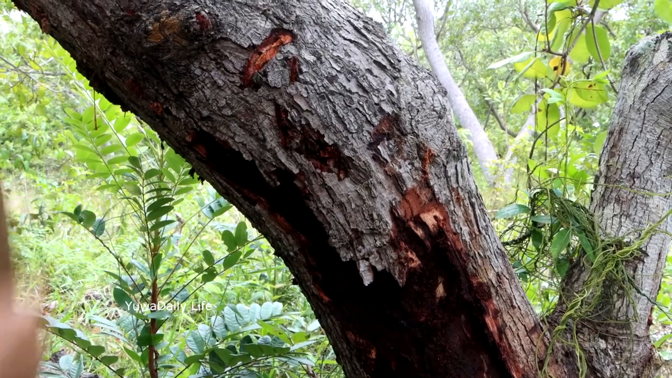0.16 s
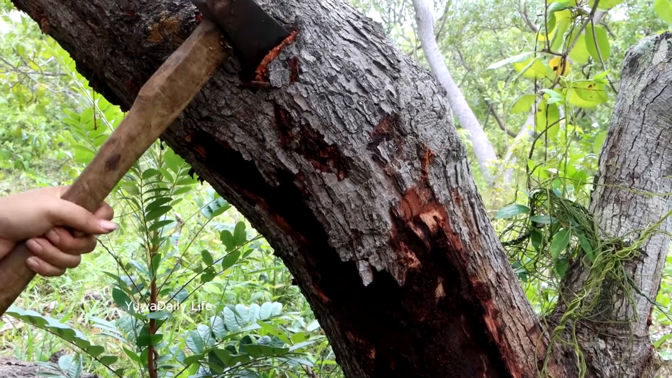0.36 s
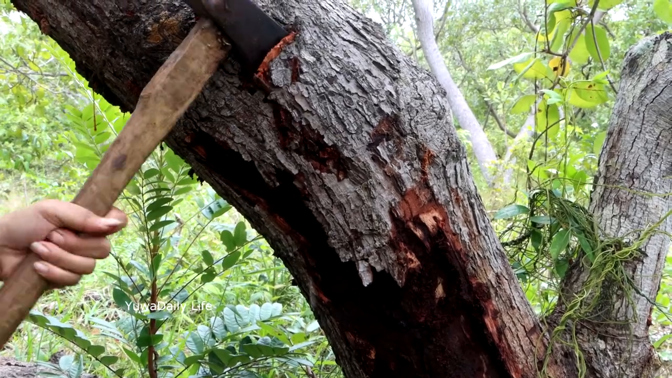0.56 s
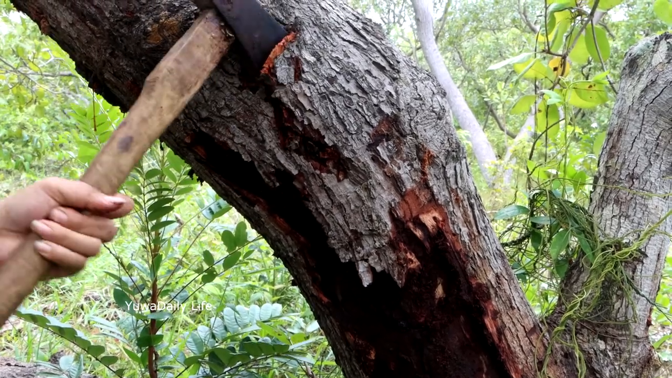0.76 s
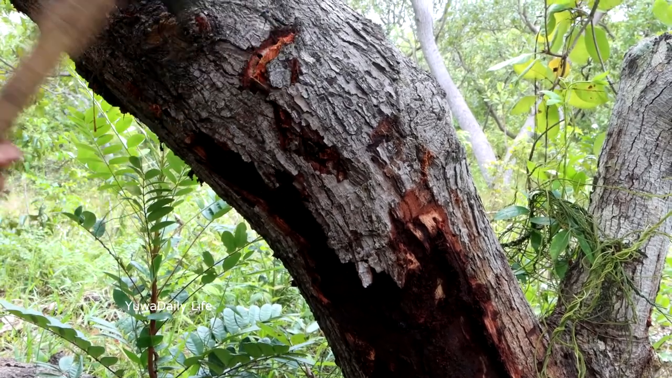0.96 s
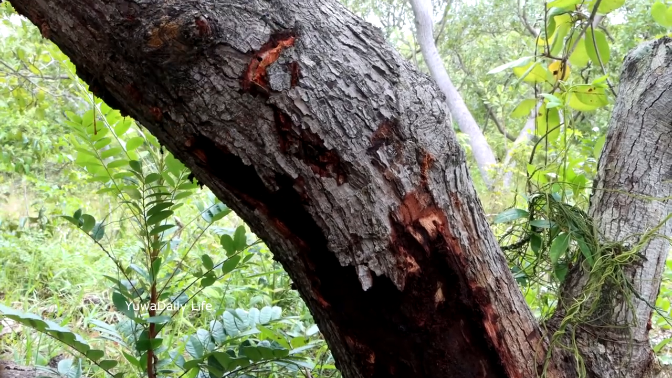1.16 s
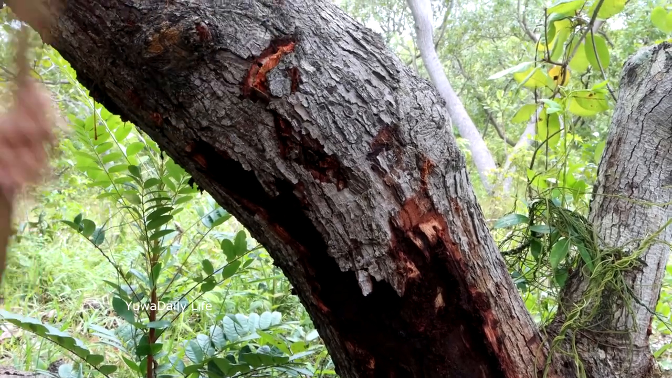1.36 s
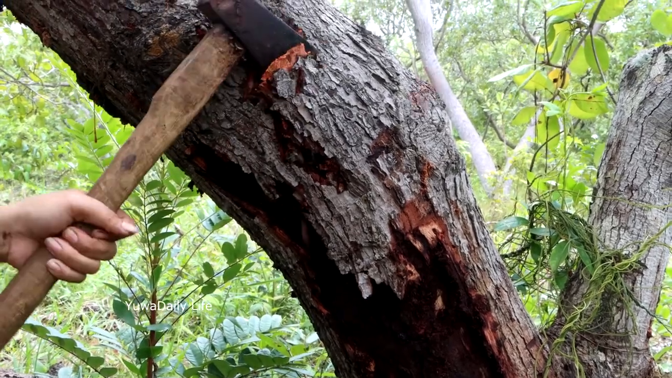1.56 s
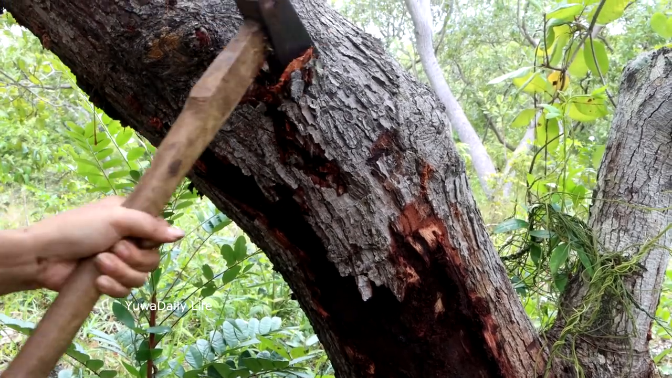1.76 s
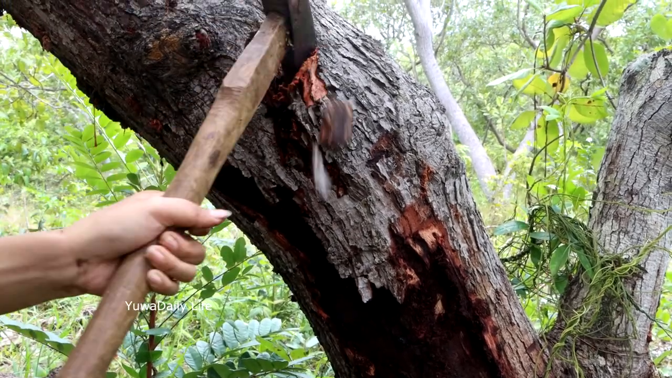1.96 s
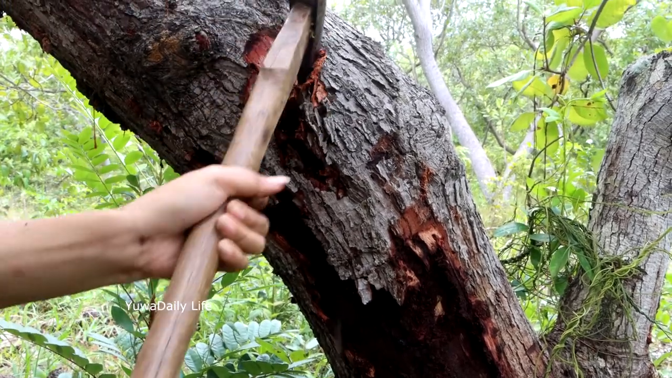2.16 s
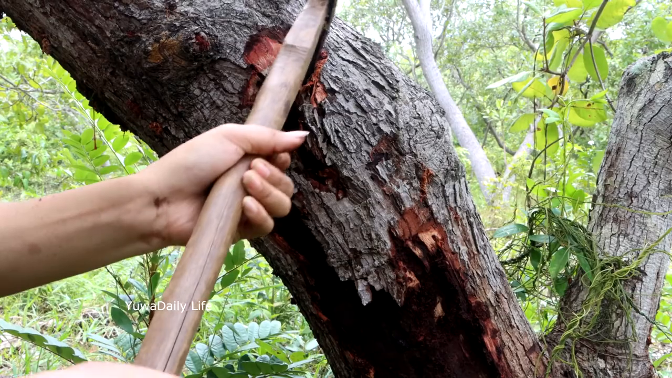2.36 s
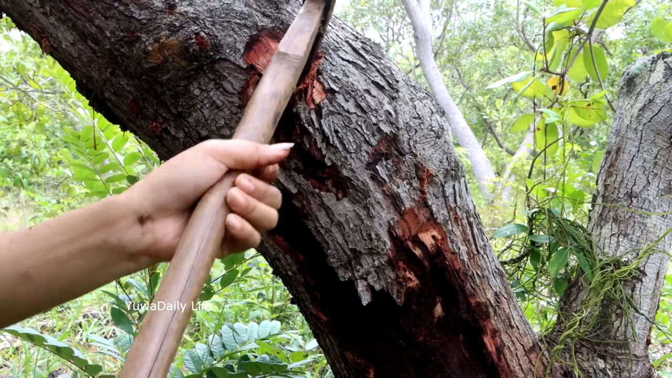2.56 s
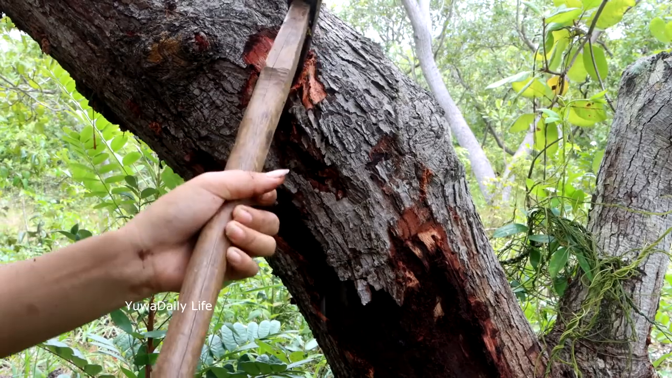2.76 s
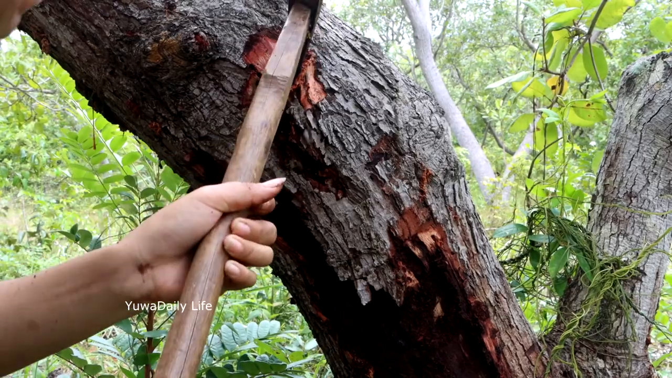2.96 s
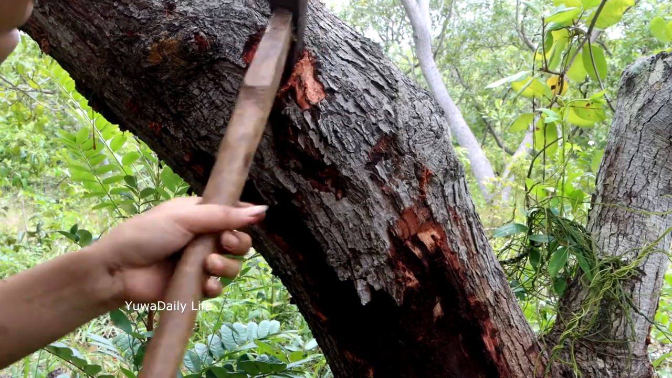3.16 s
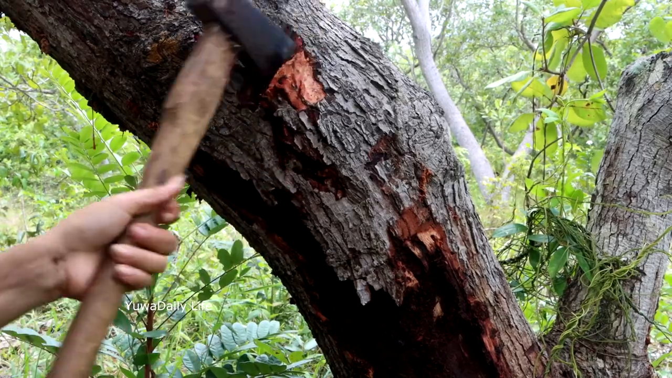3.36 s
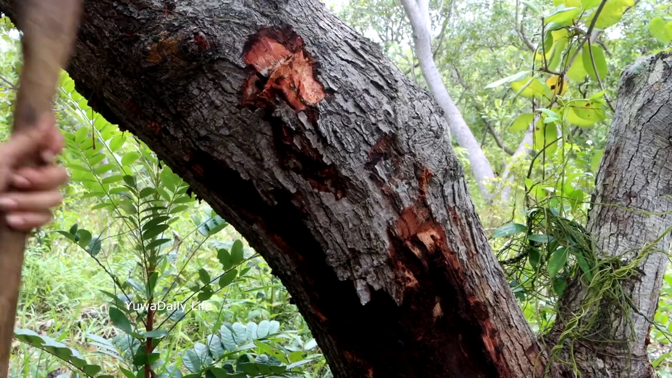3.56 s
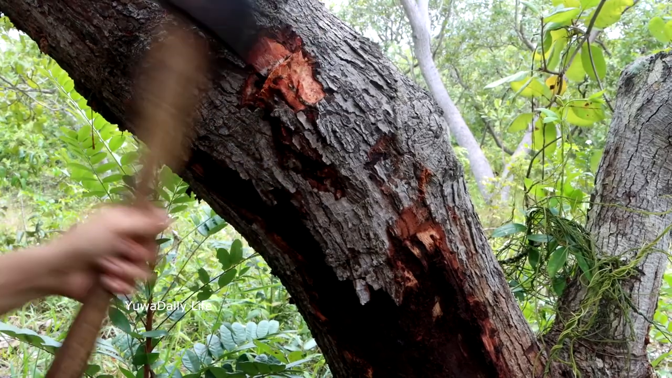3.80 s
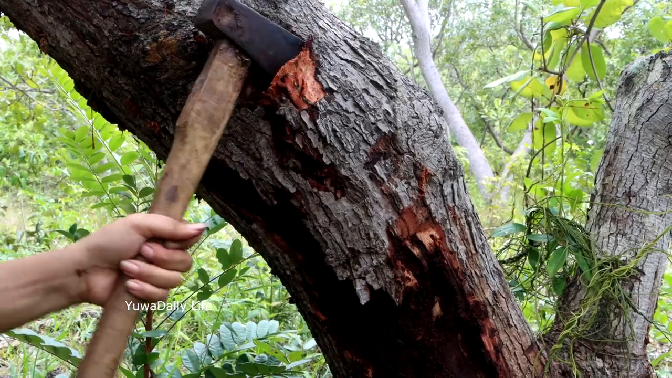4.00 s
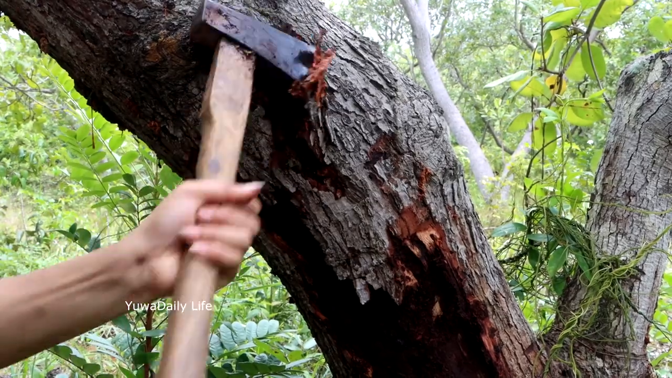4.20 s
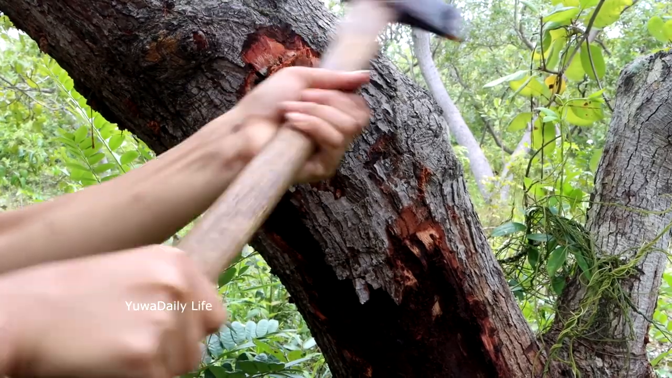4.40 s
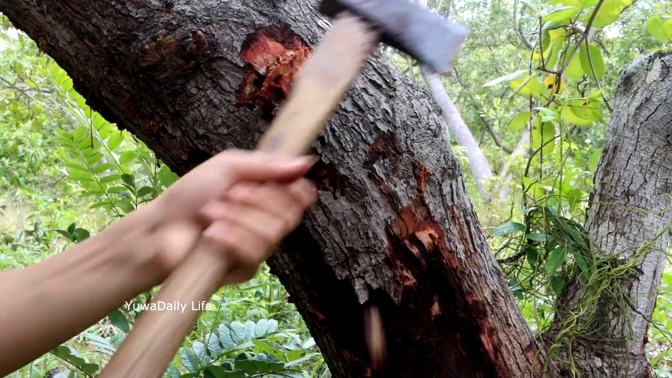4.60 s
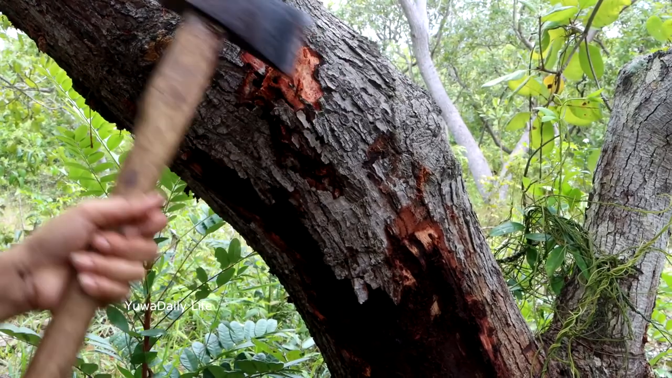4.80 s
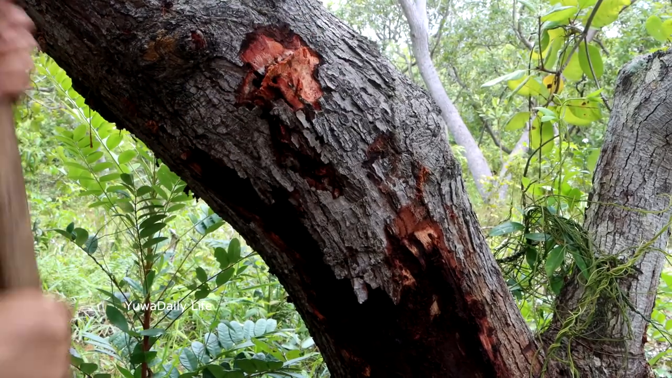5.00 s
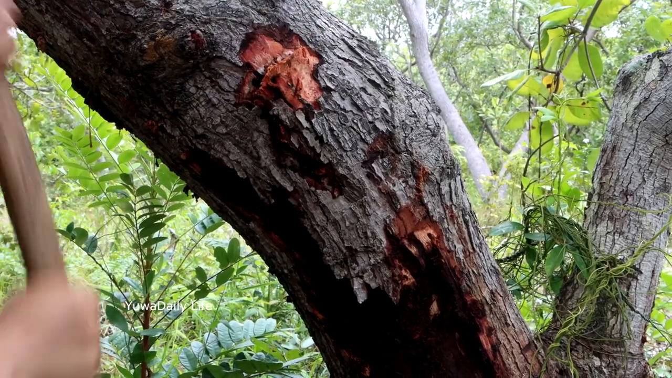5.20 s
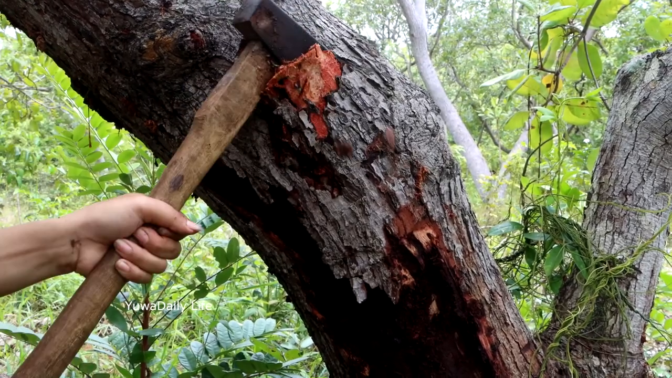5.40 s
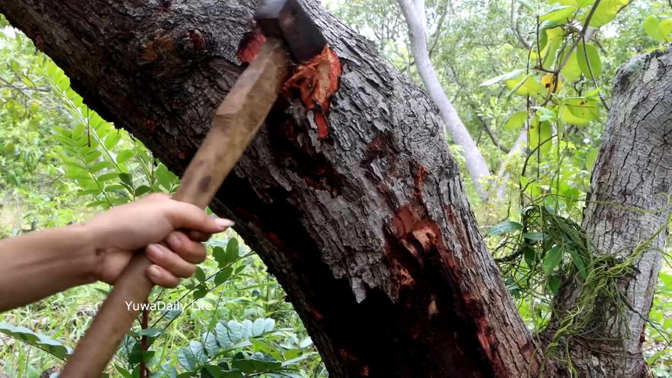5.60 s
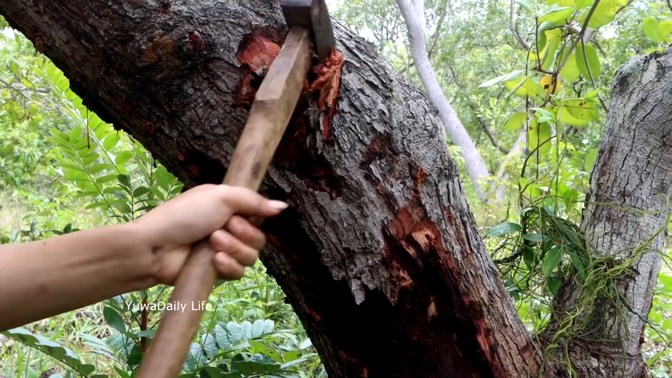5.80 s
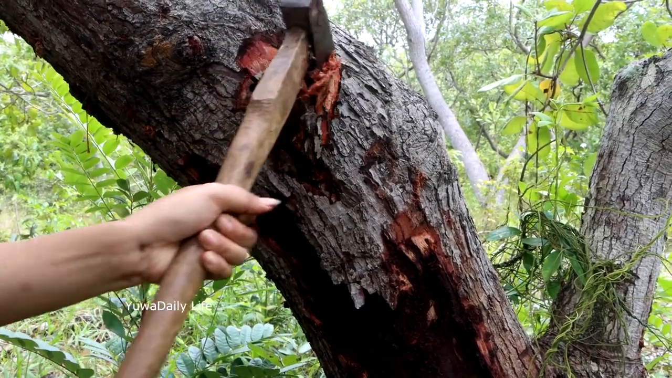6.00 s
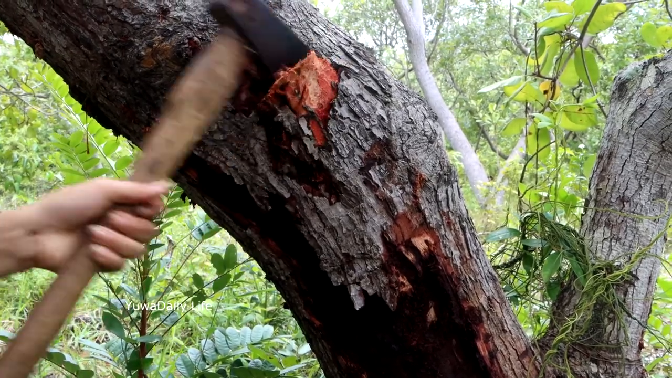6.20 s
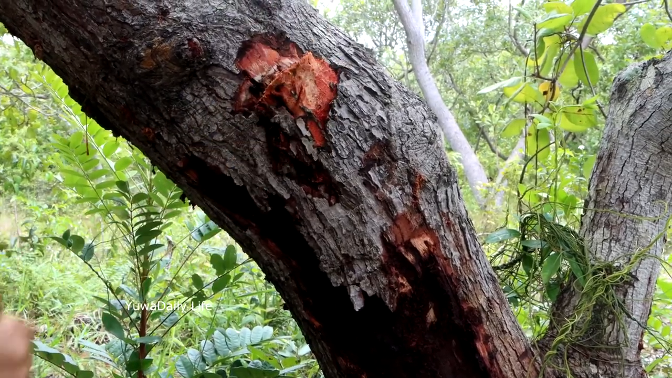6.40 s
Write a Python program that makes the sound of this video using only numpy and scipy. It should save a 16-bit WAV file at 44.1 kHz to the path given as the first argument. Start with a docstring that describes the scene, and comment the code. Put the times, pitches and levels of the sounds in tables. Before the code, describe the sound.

Four dry chops into a thick trunk in a quiet wood, heard close and centred. The first is sharp, the second has a longer, rougher tear, and after a long pause of prying come a third solid hit and a weaker, crisper fourth. Quiet bark crackle, splinter ticks, small hollow slips, light brushing and dull bumps fill the gaps, over a barely audible, slightly wide air noise.

```python
"""A small hatchet chops four times into a leaning tree trunk, close to the microphone in a quiet wood.
Each blow is a few dead knocks, short rings of trunk and steel, and a burst of tearing fibres made of grains.
Between blows the blade is levered in the cut: it slips with knocks and scrapes, bark snaps and crumbles.
Light brushing strokes and dull bumps fall in between. Undergrowth and further trees scatter a noise tail;
behind it lies the faint steady air of the wood, coloured noise that is wider in the treble."""
import sys
import numpy as np
from scipy import signal
from scipy.fft import rfft, irfft
from scipy.io import wavfile

SR = 44100
rng = np.random.default_rng(int(sys.argv[2]) if len(sys.argv) > 2 else 0)


def persist_wave(psi):
    """Save psi, clipped to +-1, as 16-bit WAV."""
    counts = np.round(np.clip(psi, -1, 1) * 32767).astype(np.int16)
    wavfile.write(sys.argv[1], SR, np.atleast_2d(counts).T)


N = 284445
AGE = np.arange(SR // 3) / SR  # seconds since a contact


def undb(db):
    """Decibels to gain."""
    return 10 ** (np.asarray(db) / 20)


def sized(x, db):
    """Scale a short sound so that its energy, spread over 10 ms, has this level."""
    return x * undb(db) / np.sqrt(np.sum(x ** 2) / (SR / 100))


def add(track, s, x):
    """Mix x into the track from time s on."""
    start = max(int(s * SR), 0)
    track[start:start + len(x)] += x[:max(len(track) - start, 0)]


def fade(age, t60):
    """Exponential decay by 60 dB in t60 seconds."""
    return np.exp(-np.log(1000) * age / t60)


def colour(x, points):
    """Minimum-phase filter with the given (frequency [Hz], level [dB]) outline."""
    hz, db = np.transpose(points)
    bins = np.maximum(np.fft.rfftfreq(4096, 1 / SR), 1)
    outline_db = np.interp(np.log(bins), np.log(hz), db)
    # folding the cepstrum onto positive times makes the filter causal
    cepstrum = irfft(np.log(undb(outline_db)))
    half = len(cepstrum) // 2
    cepstrum[1:half] *= 2
    cepstrum[half + 1:] = 0
    response = irfft(np.exp(rfft(cepstrum)))
    return signal.fftconvolve(x, response)[:len(x)]


def tilted(points, db_per_octave):
    """Lean a table of (frequency [Hz], level [dB], ..) rows about 1 kHz."""
    return [(hz, db + db_per_octave * np.log2(hz / 1000), *rest) for hz, db, *rest in points]


def hump(hz):
    """Outline of the broad resonance of a small piece of wood."""
    return [(hz / 9, -28), (hz / 2.28, -11), (hz, 0), (hz * 1.57, -11), (hz * 3, -25), (hz * 12, -42)]


def ring(hz, t60, rise_ms):
    """A damped resonance that builds up while the contact lasts."""
    swell = 1 - np.exp(-(1000 * AGE / rise_ms) ** 2)
    return np.sin(2 * np.pi * hz * AGE) * swell * fade(AGE, t60)


def modes(table, rise_ms):
    """All the modes of a struck object, in alternating sign, none longer than a limit that falls with pitch."""
    total = np.zeros(len(AGE))
    for k, (hz, db, t60) in enumerate(table):
        longest_t60 = .04 + 6 / hz
        total += (-1) ** k * undb(db) * ring(hz, min(t60, longest_t60), rise_ms)
    return total


def grains(size, rate, spread_db):
    """Random tiny fractures, rate per second, most weak and a few strong."""
    strength = undb(spread_db * np.minimum(rng.exponential(size=size), 4))
    return (rng.random(size) < rate / SR) * strength * rng.standard_normal(size)


def tearing(bite_ms, t60, spread_db):
    """Fibres break densely while the blade moves and die away once it stops."""
    stopped = np.maximum(AGE - bite_ms / 1000, 0)  # seconds since the blade stopped
    slowing = np.exp(-.6 * np.minimum(1000 * AGE / bite_ms, 1))
    onset = 1 - np.exp(-AGE / 0.00074)
    return grains(len(AGE), 14000, spread_db) * onset * slowing * fade(stopped, t60)


# the four blows: (time [s], trunk level [dB], trunk tilt [dB/octave], tearing level [dB],
# tearing tilt [dB/octave], splinter level [dB], bite [ms], head ring level [dB])
BLOWS = [(0.3143, -29.5, 2.5, -28.5, -3, -52, 3.9, -40.5),
         (1.4798, -35.5, 2.5, -26.5, -2, -42.5, 15.9, -30.5),
         (3.8922, -33, 0.5, -34.5, 0.5, -52, 10.6, -35), (5.3897, -39.5, -2, -35.5, 3, -50, 7.6, -40.5)]
# dead knocks as the blade enters the wood in jolts: (time [s], level [dB], frequency [Hz], t60 [s])
ENTRY_JOLTS = [(0.3148, -25, 877, 0.01), (0.318, -27.5, 1508, 0.0054), (0.3196, -34.5, 720, 0.013),
               (1.4801, -27.5, 740, 0.016), (1.484, -33.5, 1345, 0.0086), (1.4876, -48, 2030, .008),
               (1.4947, -36, 1060, .008), (3.8924, -25.5, 1233, 0.012), (3.8972, -39.5, 373, 0.018),
               (5.3933, -47.5, 493, 0.0085), (5.394, -52, 230, 0.04)]
# trunk under the blade, before tilt and length limit: (frequency [Hz], relative level [dB], t60 [s])
TRUNK_MODES = [(185, -4, 0.053), (278, 0, 0.083), (330, -5, 0.032), (415, 3.5, 0.026), (575, 1, 0.016),
               (719, 1.5, .035), (839, 3, 0.095), (1122, -1, 0.018), (1200, -9.5, .028), (1485, -7, 0.027)]
# steel head and handle, damped by the cut, before length limit:
# (frequency [Hz], relative level [dB], t60 [s])
HEAD_MODES = [(1910, 1.5, 0.029), (2335, -11, 0.022), (2478, 3, 0.025), (2963, -3, 0.017),
              (3327, 5.5, 0.027), (3970, -12, .03), (4380, 1, .02), (4340, -1, 0.047), (4910, -15, 0.022),
              (6500, -10, 0.0367)]
# colour of tearing wood, before tilt: (frequency [Hz], relative level [dB])
TEARING_COLOUR = [(60, -21), (150, -21), (400, -9), (750, -2.5), (1500, -5), (2100, -2), (2600, 0),
                  (3400, -3), (4700, 1), (5800, -14.5), (8000, -21.5), (16000, -32.5)]
# colour of its finest splinters: (frequency [Hz], relative level [dB])
SPLINTER_COLOUR = [(2500, -28), (5000, -5.5), (7000, -2.5), (9500, -6.5), (13000, 1), (16000, -3)]
# colour of scraped and crumbling bark, also for slips and crumble: (frequency [Hz], relative level [dB])
BARK_COLOUR = [(200, -18), (500, -7.5), (830, 1.5), (1100, -5.5), (1450, 0), (2000, -4.5), (3000, -0.5),
               (4500, -5.5), (7000, -14), (10000, -21.5), (16000, -25.5)]


def chops():
    """The edge knocks its way in, fibres tear, trunk and steel ring briefly, loosened bark crackles after."""
    out = np.zeros(N)
    for s, db, hz, t60 in ENTRY_JOLTS:
        add(out, s, sized(ring(hz, t60, rise_ms=0.93), db))
    for s, trunk_db, trunk_tilt, tear_db, tear_tilt, splinter_db, bite_ms, head_db in BLOWS:
        trunk = modes(tilted(TRUNK_MODES, trunk_tilt), rise_ms=1.9)
        head = modes(HEAD_MODES, rise_ms=2.2)
        fibres = tearing(bite_ms, t60=0.023, spread_db=1.5)
        splinters = tearing(bite_ms * 0.41, t60=.045, spread_db=1.5)
        bark = tearing(bite_ms, t60=.11, spread_db=4.0)
        add(out, s, sized(trunk, trunk_db))
        add(out, s, sized(head, head_db))
        add(out, s, sized(colour(fibres, tilted(TEARING_COLOUR, tear_tilt)), tear_db))
        add(out, s, sized(colour(splinters, SPLINTER_COLOUR), splinter_db))
        add(out, s, sized(colour(bark, BARK_COLOUR), tear_db - 15.0))
    return out


# the blade slips in the cut:
# (time [s], knock level [dB], knock frequency [Hz], scrape level [dB], scrape length [ms])
BLADE_SLIPS = [(0.078, -57.5, 930, -58.5, 2.3), (0.6304, -44.5, 646, -64.5, 1.2),
               (0.6503, -53.5, 830, -70, 1.1), (0.6664, -48, 865, -69, 3.3), (0.702, -55, 533, -56.5, 3.7),
               (1.7774, -56, 807, -53.5, 4.2), (1.9601, -41.5, 816, -52.5, 12), (1.999, -53, 875, -55, 2.3),
               (2.0419, -46, 861, -48, 6), (2.141, -57, 840, -55.5, 14), (2.193, -63.5, 926, -55, 3.4),
               (4.277, -66.5, 634, -68.5, 2.6), (4.848, -65, 800, -61.5, 1.4),
               (5.763, -58, 1500, -60.5, 0.99), (5.882, -52.5, 810, -54.5, 5.5),
               (5.902, -67, 845, -57, 6.4), (6.073, -75, 840, -52, 4.8), (6.083, -74, 843, -53, 9.4),
               (6.116, -70, 850, -56.5, 6.9), (6.326, -66, 815, -48.5, 17.7)]


def slips():
    """The stuck blade gives way: a dead tick, a hollow knock and a short stick-slip scrape."""
    out = np.zeros(N)
    for s, knock_db, hz, scrape_db, scrape_ms in BLADE_SLIPS:
        knock = ring(hz, t60=0.018, rise_ms=0.24 + 0.26 * scrape_ms)  # longer slips knock more softly
        tick = ring(hz * 1.25, t60=0.0024, rise_ms=0.38)
        scrape = colour(tearing(scrape_ms, t60=0.036, spread_db=0.5), BARK_COLOUR)
        add(out, s, sized(knock, knock_db) + sized(tick, knock_db - 8) + sized(scrape, scrape_db))
    return out


# the larger splinters snap: (time [s], level [dB], centre frequency [Hz])
SPLINTER_SNAPS = [(0.8101, -55, 2830), (0.8633, -62.5, 3100), (1.1871, -65, 3810), (1.716, -63, 3240),
                  (2.1173, -52, 3540), (2.2344, -56.5, 3480), (2.5762, -59, 3200), (2.6896, -55, 4440),
                  (3.2967, -65.5, 3520), (3.4012, -60.5, 3046), (4.1285, -64.5, 3340), (4.8963, -51, 2920),
                  (4.912, -58, 4170), (4.93, -54.5, 3520), (4.9468, -57.5, 3400), (5.1334, -59, 2780),
                  (5.9691, -53, 4180)]


def snaps():
    """Single splinters crack: a brief ping at their own pitch and a few breaking fibres."""
    out = np.zeros(N)
    for s, db, hz in SPLINTER_SNAPS + small_snaps():
        ping = ring(hz, t60=.005, rise_ms=.25)
        fibres = colour(tearing(bite_ms=0.32, t60=0.014, spread_db=7.0), hump(hz))
        add(out, s, sized(ping, db - 5.5) + sized(fibres, db - 1.5))
    return out


SMALL_SNAPS_PER_S, SMALL_SNAP_HZ = 7, 3500
SMALL_SNAP_OCTAVES = .35  # pitch range to either side
SMALL_SNAP_DB, SMALL_SNAP_FOLLOW = -69.5, 0.68  # level at rest; dB gained per dB of crumbling


def small_snaps():
    """Rows (time [s], level [dB], frequency [Hz]) of faint chance snaps, louder under strain."""
    above_rest_db = 20 * np.log10(strain() / undb(RESTING_DB))
    rows = []
    for when, pitch in rng.random((int(SMALL_SNAPS_PER_S * N / SR), 2)):
        db = SMALL_SNAP_DB + SMALL_SNAP_FOLLOW * above_rest_db[int(when * N)]
        hz = SMALL_SNAP_HZ * 2 ** (SMALL_SNAP_OCTAVES * (2 * pitch - 1))
        rows.append((when * N / SR, db, hz))
    return rows


# pitches at which crumbs of bark break: (frequency [Hz], relative level [dB])
CRUMB_SIZES = [(1450, -10), (2300, -11), (3100, -2), (4100, -9.5), (5600, -2), (8500, -12.5)]


def crumble():
    """Crumbs of several sizes crackle independently over a fine rub, following the pressure on the handle."""
    crackle = np.zeros(N)
    for hz, crumb_db in CRUMB_SIZES:
        crumbs = colour(grains(N, rate=200, spread_db=5.0), hump(hz))
        crumbs = colour(crumbs, hump(hz))  # each size keeps to its own narrow pitch range
        crackle += undb(crumb_db) * crumbs / np.std(crumbs)
    crackle /= np.std(crackle)
    rub = colour(grains(N, rate=17000, spread_db=5.5), BARK_COLOUR)
    rub /= np.std(rub)
    return (undb(-5.5) * crackle + undb(-3.5) * rub) * strain()


# pulls on the handle, each building until the wood gives:
# (time it gives [s], crumbling level [dB], build-up time constant [s], release time constant [s])
HANDLE_PULLS = [(0.01, -61, .05, 0.084), (0.82, -65.5, 0.14, 0.25), (2.04, -59, 0.24, 0.27),
                (2.47, -58, 0.14, 0.046), (2.68, -66, 0.13, 0.085), (4.92, -63, 0.12, 0.18),
                (5.89, -61.5, 0.16, 0.14), (6.1, -60, 0.044, 0.092), (6.34, -60.5, 0.086, 0.15)]
RESTING_DB = -75  # loose bark still trickles between pulls


def strain():
    """Crumbling as a gain: it grows with each pull on the handle and dies away once the wood gives."""
    t = np.arange(N) / SR
    power = undb(RESTING_DB) ** 2
    for s, db, build_s, release_s in HANDLE_PULLS:
        pull = undb(db) * np.exp(-np.maximum((s - t) / build_s, (t - s) / release_s))
        power = power + pull ** 2
    return np.sqrt(power)


# dry brushing strokes as the hatchet is moved:
# (time [s], level [dB], swell [ms], tilt [dB/octave])
BRUSH_STROKES = [(3.476, -57, 16.4, -3), (4.373, -49, 20.4, 0)]
# colour of a brushing stroke, before tilt: (frequency [Hz], relative level [dB])
BRUSH_COLOUR = [(200, -27), (600, -12), (1350, -2), (2200, -11.5), (4500, -19), (8000, -38), (16000, -37.5)]


def brushes():
    """A light, grainy rub that swells and stops."""
    out = np.zeros(N)
    for s, db, swell_ms, tilt in BRUSH_STROKES:
        progress = 1000 * AGE / swell_ms
        swell = progress * np.exp(-progress ** 4 / 4)  # strongest at progress 1
        rub = grains(len(AGE), rate=2500, spread_db=3) * swell
        add(out, s, sized(colour(rub, tilted(BRUSH_COLOUR, tilt)), db))
    return out


# soft low bumps: (time [s], level [dB], frequency [Hz])
LOW_BUMPS = [(0.932, -62.5, 132), (0.985, -59.5, 79), (1.675, -64.5, 111), (2.108, -57.5, 112),
             (2.167, -70, 139), (2.227, -63, 133), (5.583, -68, 91), (5.618, -65.5, 79.6)]


def bumps():
    """Dull, quiet thumps between the blows: low resonances with a slow rise."""
    out = np.zeros(N)
    for s, db, hz in LOW_BUMPS:
        add(out, s, sized(ring(hz, t60=0.043, rise_ms=9.1), db))
    return out


# colour of what the undergrowth sends back: (frequency [Hz], relative level [dB])
SCATTER_COLOUR = [(60, -2.5), (200, 4), (600, -2.5), (1300, -12.5), (3200, 0), (4800, -1.5), (7000, 9),
                  (16000, -2.5)]


def undergrowth(x, near_db, near_t60, far_db, far_t60):
    """Ground and leaves scatter a quick tail, further trees a faint longer one."""
    swell = 1 - np.exp(-(AGE / 0.0088) ** 2)
    near, far = rng.standard_normal((2, len(AGE))) * swell
    near = colour(near * fade(AGE, near_t60), SCATTER_COLOUR)
    far = colour(far * fade(AGE, far_t60), SCATTER_COLOUR)
    response = undb(near_db) * near / np.linalg.norm(near) + undb(far_db) * far / np.linalg.norm(far)
    return signal.fftconvolve(x, response)[:N]


# colour of the still air: (frequency [Hz], relative density [dB per Hz])
FOREST_COLOUR = [(15, -38), (25, -4.5), (87, -3.5), (335, -3), (607, -4.5), (714, -5.5), (796, -2),
                 (863, -4.5), (2220, -11.5), (2990, -17), (3430, -12.5), (3720, -16.5), (14000, -18.5),
                 (16000, -25)]
# how much the still air differs left and right: (frequency [Hz], side minus mid [dB])
FOREST_WIDTH = [(30, -7.5), (150, -12.5), (1000, -16), (4000, -8.5), (8000, -3.5), (16000, -2.5)]
FOREST_DB = -69.5  # level of the mid


def forest():
    """Faint steady air of the wood: coloured noise, wider in the treble."""
    mid = colour(rng.standard_normal(N), FOREST_COLOUR)
    side = colour(rng.standard_normal(N), FOREST_COLOUR)
    side = colour(side, FOREST_WIDTH)
    return undb(FOREST_DB) * np.array([mid + side, mid - side]) / np.std(mid)


def scene():
    """All the work happens straight ahead; only its scatter differs a little left and right."""
    work = chops() + slips() + brushes() + crumble() + snaps()
    low_cut = signal.butter(2, 100, "high", fs=SR, output="sos")  # keeps slow offsets of the rings out
    work = signal.sosfilt(low_cut, work) + bumps()
    mid = work + undergrowth(work, near_db=-18, near_t60=0.083, far_db=-28.0, far_t60=.45)
    side = undergrowth(work, near_db=-54, near_t60=.04, far_db=-57, far_t60=.3)
    return np.array([mid + side, mid - side]) + forest()


TOP_HZ = 16100


def record(dry):
    """The recorder cuts the top with a steep low-pass."""
    return signal.sosfilt(signal.ellip(10, .2, 70, TOP_HZ, fs=SR, output="sos"), dry)


dry = scene()
out = record(dry)
persist_wave(out)
```